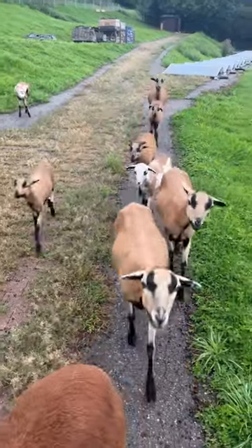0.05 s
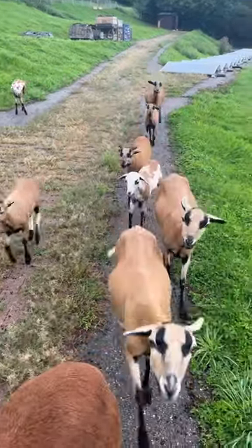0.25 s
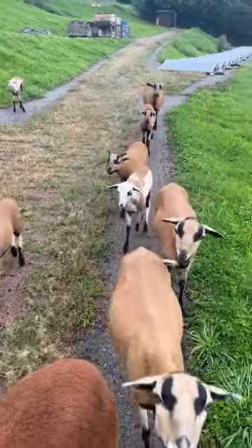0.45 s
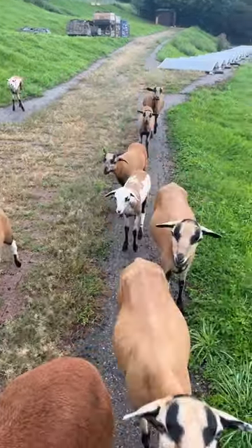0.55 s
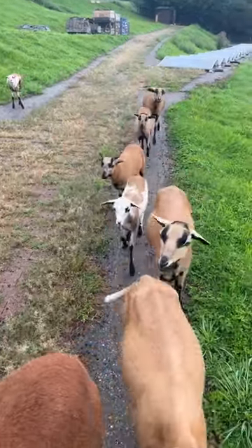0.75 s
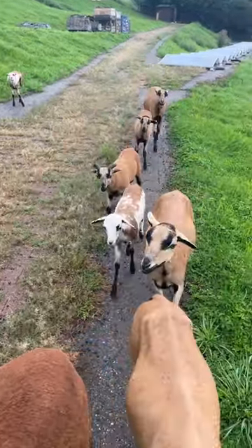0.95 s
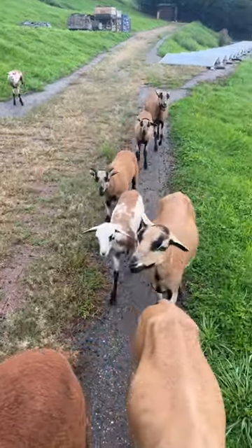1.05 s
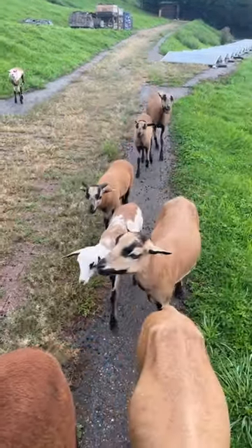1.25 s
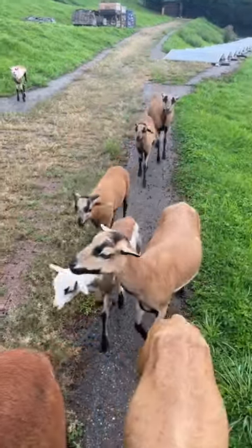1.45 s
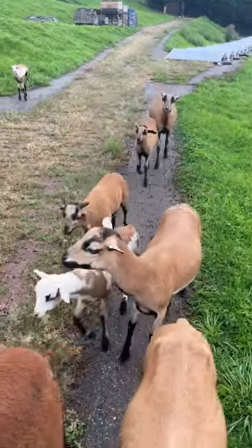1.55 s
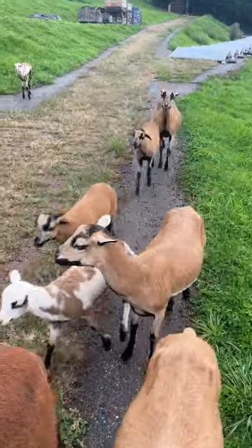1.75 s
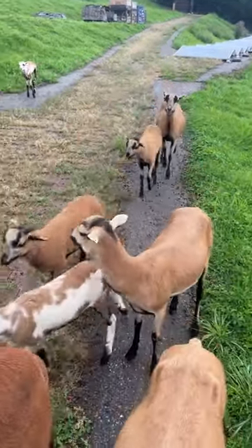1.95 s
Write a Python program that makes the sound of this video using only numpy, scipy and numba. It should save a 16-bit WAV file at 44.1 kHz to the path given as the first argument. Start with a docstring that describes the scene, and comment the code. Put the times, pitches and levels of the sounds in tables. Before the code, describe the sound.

A sheep bleats once close to the microphone: a faint creak from 0.14 s, voice catching at 0.2 s, rising to a buzzy, nasal, wavering low tone by 0.45 s, held until about 1.15 s, then sagging and cutting off near 1.35 s. Short echoes stay tight. Quiet outdoor rumble, rustle and hiss continue, with a slight swish around 1.5 s and faint gravel hoof ticks at 1.62 and 1.82 s.

```python
"""A sheep bleats once, low and buzzy, just to the right on a gravel path between fields.
Uneven vocal pulses creak in, settle to a clean wavering pitch and ring throat and chest filters;
a sine hums underneath, and delayed copies echo off the ground and the flock.
Hooves tick on gravel as filtered noise bursts, over a low outdoor rumble, rustle and hiss of shaped noise.
Two microphone ports colour left and right differently."""
import sys
import numpy as np
from scipy import signal
from scipy.fft import rfft, irfft
from scipy.io import wavfile
from scipy.ndimage import uniform_filter1d, map_coordinates
from numba import njit

SR = 44100
rng = np.random.default_rng(int(sys.argv[2]) if len(sys.argv) > 2 else 0)


def transcribe(u):
    """Save the signal u as a 16-bit wav file named by the first command-line argument.

    u: samples, shape (n,) or (channels, n), limited to [-1, 1]; the rate is SR.
    q: integer samples, one column per channel.
    """
    v = np.clip(np.atleast_2d(u).T, -1, 1)
    q = np.round(v * 32767).astype(np.int16)
    wavfile.write(sys.argv[1], SR, q)


N = 88200  # two seconds of samples
T = np.arange(N) / SR


def undb(db):
    """Turn dB into a gain."""
    return 10 ** (np.asarray(db) / 20)


def unit(x):
    """Scale to an rms of 1."""
    return x / np.sqrt(np.mean(x ** 2))


def curve(table, column=1, at=T):
    """Draw straight lines between the rows of a table whose first column is seconds."""
    columns = np.array(table).T
    return np.interp(at, columns[0], columns[column])


@njit
def band(x, hz, width):
    """Resonate with a state-variable band-pass whose centre may move, gain 1 at the centre."""
    y, band_state, low_state = np.empty(len(x)), 0., 0.
    for i in range(len(x)):
        g, damping = np.tan(np.pi * hz[i] / SR), width[i] / hz[i]
        v = (band_state + g * (x[i] - low_state)) / (1 + g * (g + damping))
        band_state = 2 * v - band_state
        low_state += 2 * g * v
        y[i] = damping * v
    return y


def resonate(x, hz, width):
    """Band-pass a sound; centre and width in Hz are numbers or curves."""
    return band(x, hz + np.zeros(N), width + np.zeros(N))


def butter(x, order, hz, kind="low"):
    """Apply a smooth low-pass or high-pass."""
    return signal.sosfilt(signal.butter(order, hz, kind, fs=SR, output="sos"), x)


def delayed(x, lag_ms):
    """Read a sound late by a lag that may change; a changing lag also bends its pitch."""
    return map_coordinates(x, [(T - lag_ms / 1000) * SR])


def noise(points):
    """Shape white noise by (Hz, relative dB) points, far weaker outside them, to an rms of 1."""
    hz, db = np.array(points).T
    f = np.maximum(np.arange(N // 2 + 1) * SR / N, 1)
    shape_db = np.interp(np.log(f), np.log(hz), db, -36 + db[0], -45 + db[-1])
    return unit(irfft(rfft(rng.standard_normal(N)) * undb(shape_db), N))


def walk(rate):
    """Wander slowly: smoothed random steps, rate of them per second, with an rms of 1."""
    k = int(SR / rate)
    steps = np.repeat(rng.standard_normal(N // k + 1), k)
    return unit(uniform_filter1d(steps, k)[:N])


# How the two microphone ports differ.
# Each row: frequency in Hz, left minus right in dB, how far the left leads in radians.
PORT_DIFFERENCE = [(100, 0, 0), (400, -2.5, -.9), (950, -8, -1.4), (1200, -10, .1), (1600, -5, .8),
                   (2250, 2.5, 1.7), (2650, 0, 1.6), (3050, -7, 2.1), (3700, -1.5, 1.6), (4400, -3, 2.1),
                   (5300, 1.5, 2.4), (6000, 0, 3.14), (7200, 0, 5.6), (8000, 0, 6.2), (8900, 0, 6.45),
                   (9600, -.5, 9.2), (10500, 0, 9.55), (12000, 0, 12.5), (13200, 0, 12.9), (14000, 0, 15.6),
                   (14900, 0, 18.2), (16000, 0, 18.8)]


def ports(x, lean_db=0):
    """Send one sound to both ports: the left is filtered and phase-shifted against the right."""
    hz, db, turn = np.array(PORT_DIFFERENCE).T
    f = np.arange(N // 2 + 1) * SR / N
    left = irfft(rfft(x) * undb(np.interp(f, hz, db)) * np.exp(1j * np.interp(f, hz, turn)), N)
    low = butter(left, 2, 1000)
    return np.array([left + low * (undb(lean_db) - 1), x])  # the lean acts on the left's lows


# Tone of the low outdoor rumble. Each row: frequency in Hz, relative strength in dB per Hz.
RUMBLE_TONE = [(25, -32), (35, -24), (48, -4.5), (85, -6.5), (113, 1.5), (140, -11.5), (200, -13.5),
               (330, -13.5), (420, -19)]
# Tone of the rustle in the middle. Each row: frequency in Hz, relative strength in dB per Hz.
RUSTLE_TONE = [(300, -24.5), (450, 1), (700, -6.5), (1400, -12), (2200, -19), (3500, -17.5), (5300, -25)]
# How loud the rustle is. Each row: time in seconds, level in dB before flicker.
RUSTLE_LOUDNESS = [(0, -68), (.06, -60), (.12, -59), (.18, -57), (1.36, -60), (1.5, -59.5), (1.62, -61),
                   (1.72, -60.5), (1.83, -60), (1.9, -61.5), (2, -61)]
# Tone of the wide rustle. Each row: frequency in Hz, relative strength in dB.
WIDE_TONE = [(35, -33), (60, 3.5), (486, 6), (732, -1), (834, 3), (1490, -5), (1700, -7.5), (5200, -14.5),
             (6760, -75), (11400, -120)]
# Tone of the thin hiss. Each row: frequency in Hz, relative strength in dB per Hz.
HISS_TONE = [(4500, 7), (6000, -1.5), (8000, -2.5), (10500, 2.5), (13000, -1.5), (14000, -4), (15500, -15),
             (16500, -15)]
# How loud the hiss is. Each row: time in seconds, level in dB before flicker and ports.
HISS_LOUDNESS = [(0, -71.5), (.17, -71), (.3, -71), (1.33, -71), (1.37, -72), (1.45, -64.5), (1.529, -59.5),
                 (1.62, -64), (1.75, -69.5), (1.82, -64.5), (1.9, -70.5), (2, -67)]
RUMBLE_DB, WIDE_DB = -49, -60.5
FLICKER_DB, FLICKER_HZ = 1.2, 14


def flicker():
    """Waver the loudness at random by a dB or so."""
    return undb(FLICKER_DB * walk(FLICKER_HZ))


def field():
    """Layer steady rumble with flickering rustle and hiss; opposite signs left and right spread the sides."""
    rumble = noise(RUMBLE_TONE) * undb(RUMBLE_DB)
    rustle = noise(RUSTLE_TONE) * undb(curve(RUSTLE_LOUDNESS)) * flicker()
    side = noise(WIDE_TONE) * undb(WIDE_DB) * flicker()
    hiss = noise(HISS_TONE) * undb(curve(HISS_LOUDNESS)) * flicker()
    middle = rumble + rustle
    return np.array([middle + side, middle - side]) + ports(hiss)


HOOF_FALL_S, HOOF_RISE_S = .004, .0006
KNOCK = 10.3  # size of the first knock against the crunch
# Hooves on gravel. Each row: time in seconds, gain in dB before filtering, centre of the tone in Hz.
HOOF_STEPS = [(0.108, -60, 9600), (0.167, -45.5, 7600), (1.62, -37, 900), (1.66, -54, 5060),
              (1.819, -46.5, 3650), (1.835, -47, 1900)]


def hooves():
    """Crunch gravel: a knock inside a very short noise burst, band-passed twice."""
    out = np.zeros(N)
    for s, db, hz in HOOF_STEPS:
        fade_s = np.where(T < s, HOOF_RISE_S, HOOF_FALL_S)
        burst = np.exp(-np.abs(T - s) / fade_s) * rng.standard_normal(N)
        burst[int(s * SR)] += KNOCK
        out += undb(db) * resonate(resonate(burst, hz, hz), hz, hz)
    return ports(out)


# How the bleat changes. Each row: time in seconds, relative level in dB, then trims in dB for the second,
# the third and the fourth throat row, the fifth to seventh together and the eighth, left minus right lean
# of the lows in dB, then trims in dB for the treble (last three throat rows), nasal ring and chest.
BLEAT_SHAPE = [(0.19, -54.5, 12.5, 13, -28, -17, -5, -5, -11, -8, 3),
               (0.206, -43, 2.5, 18, -2, -4.5, 2.5, 4, -6, -10, 8),
               (0.25, -39, -3, -1, -6.5, -10, -5, 0.5, 1, -6, 0.5),
               (0.296, -38.5, -3, -2.5, -8.5, -6, -15, 6, -2, 5, -13),
               (0.312, -38, 2.5, 4, 0, -8, -5, -2, 5, -11, 4),
               (0.356, -35, 2.5, 11, 4, 4.5, 3.5, 2.5, 6.5, 14, 6.5),
               (0.42, -31.5, 3, 11.5, 3.5, 0, 5, 3, 7, 2, -8),
               (0.455, -28.5, -1, 7, -3, -4, 3, 0, 1.5, 6, -3.5),
               (0.532, -28.5, -1, 6, -3.5, -2.5, 2.5, -1, 4, -12, -5.5),
               (0.592, -29.5, 3.5, 7.5, -0.5, 1.5, 1, 1, 5.5, -8, 1.5),
               (0.64, -31.5, 2.5, 4.5, -0.5, 1, 5.5, -0.5, 17.5, -11, -2),
               (0.676, -32.5, -0.5, 0, 0, 0.5, 5.5, -1, 11, -6, -3),
               (0.748, -32.5, -1, -1.5, 0, 0, -4, -0.5, 1, -9, 0),
               (0.832, -30, 2, 2, 3.5, -0.5, 2.5, 1.5, 5, 1, 3.5),
               (0.928, -30.5, -3, -1, 2, -1, -5, 1, -1, -5, -2),
               (1.01, -30.5, -9.5, 0.5, -1.5, -5, 2, 1.5, -3.5, 16, -2.5),
               (1.074, -28.5, -4.5, 1.5, -0.5, -1, 2, 2, 4, 7.5, -1.5),
               (1.116, -29.5, -4.5, 1.5, -2, -3.5, 1, 3, -9, 7, 0),
               (1.178, -35, -1.5, 2.5, 3, 0.5, 3.5, 3.5, -4, 10.5, 1),
               (1.285, -36, -8.5, -3, 0.5, -4.5, -5.5, 1.5, -21, 9, 2.5),
               (1.318, -37.5, -15.5, -9, -9, -14.5, -23, 5, -22, 7, -6.5),
               (1.35, -68.5, 6, -17, -16, -27, 1, 1, -5, -10, -2)]
START_S, END_S = BLEAT_SHAPE[0][0], BLEAT_SHAPE[-1][0]


def bleat(column):
    """Follow one column of the bleat over time."""
    return curve(BLEAT_SHAPE, column)


CREAK_S, CREAK_HZ, CREAK_DB = 0.14, 95.6, -60.5  # faint creak before the voice catches
CREAK_DB_PER_S = 130
FIRST_PULSE_S = .1945
CLOSE_S = 1.324  # vocal pulses stop here
HUM_SAG_HZ_PER_S = 480
# Pitch of the bleat. Each row: time in seconds, pitch in Hz before the sag at the close.
VOICE_PITCH = [(0.19, 109.2), (0.215, 112.5), (0.24, 123.8), (0.265, 136.4), (0.29, 143.1), (0.31, 159),
               (0.33, 166.4), (0.345, 172.6), (0.365, 177.1), (0.4, 175.8), (0.425, 176.2), (0.445, 180.2),
               (0.465, 181.5), (0.49, 180.9), (0.515, 176.6), (0.535, 179.4), (0.555, 175.5),
               (0.572, 180.9), (0.59, 182.7), (0.615, 177), (0.645, 172.8), (0.675, 167.1), (0.73, 168),
               (0.755, 166.3), (0.79, 172.8), (0.815, 175.7), (0.84, 175.8), (0.87, 172.3), (0.91, 164.9),
               (0.93, 162.3), (0.97, 164.7), (1.012, 162.1), (1.045, 169.3), (1.07, 172.1), (1.095, 172.3),
               (1.115, 171.5), (1.15, 163.6), (1.18, 156.7), (1.22, 154.9), (1.27, 154), (1.293, 149.5),
               (1.313, 138.8), (1.335, 129.9)]


def vocal_cycles():
    """Count vocal cycles: the creak's rate, then the pitch curve, which sags after the pulses stop."""
    sag = HUM_SAG_HZ_PER_S * np.clip(T - CLOSE_S, 0, .1)
    phase = np.cumsum(np.where(T < START_S, CREAK_HZ, curve(VOICE_PITCH) - sag)) / SR
    return phase - np.interp(FIRST_PULSE_S, T, phase) % 1


def voice_gain():
    """Let the level rise through the creak, follow the bleat and die away at its end."""
    release_s = 0.068  # time to fall 60 dB
    creak_db = CREAK_DB - CREAK_DB_PER_S * np.clip(START_S - T, 0, 1)
    db = np.where(T < START_S, creak_db, bleat(1)) - 60 * np.clip(T - END_S, 0, 1) / release_s
    gain = uniform_filter1d(undb(db) * (T > CREAK_S), size=100)
    return gain * np.sqrt(SR / curve(VOICE_PITCH))  # fewer pulses per second need more strength each


# Roughness of the voice. Each row: time in seconds, timing scatter as a share of the period,
# size scatter in dB, strong-weak step up and down in dB, relative breath level in dB.
ROUGHNESS = [(.12, .1, 3, 0, -16), (.18, .08, 3, 0, -18), (.19, .008, 1, 0, -26), (.26, .012, 1.5, 0, -24),
             (.32, .008, 1, .5, -24), (.36, .001, .3, 0, -30), (.6, .002, .5, 0, -28),
             (1.25, .001, .3, 0, -30), (1.29, .006, 1, 2, -23), (1.315, .015, 1.5, 1, -14),
             (1.325, .01, 1, 0, -2), (1.35, .05, 3, 0, 0)]
# Single harder pulses as the voice catches. Each row: time in seconds, added strength in dB.
VOICE_CATCHES = [(.2755, 7), (.303, 8), (.3155, 4), (1.29, 2)]
RASP_HZ, RASP_DB = 2970, 3.5  # the breath is stronger in the upper voice


def vocal_folds(phase):
    """Make one sharp pulse per cycle and a fading puff of breath noise; return low and high drive."""
    cycles = np.arange(1, int(phase[-1]))
    at = np.interp(cycles, phase, T)
    time_chance, size_chance = rng.standard_normal((2, len(at)))
    at = at + curve(ROUGHNESS, 1, at) * time_chance / curve(VOICE_PITCH, 1, at)
    size_db = curve(ROUGHNESS, 2, at) * size_chance + curve(ROUGHNESS, 3, at) * (-1.) ** cycles
    size = undb(size_db) * (at < CLOSE_S)
    for s, db in VOICE_CATCHES:
        size[np.argmin(np.abs(at - s))] *= undb(db)

    # a windowed sinc places each pulse between samples
    place = at[:, None] * SR
    index = np.clip(np.round(place).astype(int) + np.arange(-8, 9), 0, N - 1)
    shape = np.sinc(index - place) * np.cos(np.pi * (index - place) / 18) ** 2
    pulses, even = np.zeros(N), np.zeros(N)
    np.add.at(pulses, index, -shape * size[:, None])
    np.add.at(even, index, -shape * np.sqrt(size[:, None]))  # sizes differ less

    puff = undb(curve(ROUGHNESS, 4)) * 0.48 * np.exp(-(phase % 1) / 1.33) * rng.standard_normal(N)
    rasp = undb(RASP_DB) * butter(puff, 2, RASP_HZ, "high")
    gain = voice_gain()
    return gain * (even + puff / 4), gain * (pulses + puff / 2 + rasp)


# Throat resonances. Each row: centre in Hz, width in Hz, relative level in dB before the bleat's trims.
# The moving mouth replaces the centres of rows one, three, four and five and the widths of one and three.
THROAT_RINGS = [(780, 107, 7), (1474, 546, -9), (2711, 161, -2.5), (3327, 555, -7), (5000, 299, -4.5),
                (4110, 300, -25.5), (5550, 570, -9), (6700, 3460, -27.5), (9460, 510, -26.5),
                (10400, 2040, -31.5), (14000, 1200, -46)]
# The moving mouth. Each row: time in seconds, centres in Hz of the first, third, fourth and fifth
# throat resonance, width in Hz of the first, width in Hz of the third.
MOUTH = [(.2, 706, 2680, 3350, 4600, 110, 71.5), (0.298, 737, 2657, 3350, 5100, 107, 159),
         (.38, 763, 2668, 3300, 4830, 106, 85), (.45, 734, 2740, 3120, 4850, 74.6, 87),
         (.6, 746, 2763, 3270, 4930, 74, 91), (.68, 753, 2670, 3280, 4980, 111, 170),
         (.76, 758, 2690, 3140, 4950, 111, 199), (.85, 754, 2637, 3300, 5110, 102, 166),
         (.95, 736.6, 2714, 3247, 4693, 109.8, 202), (1.05, 748, 2780, 3490, 4850, 110, 200),
         (1.13, 795, 2880, 3650, 4870, 113, 200), (1.201, 807.3, 2781, 3470, 5000, 119, 292),
         (1.32, 818, 2638, 3444, 5080, 130, 348)]
NASAL_HZ, NASAL_WIDTH_HZ, NASAL_DB = 1542, 37, -12
TREBLE_FLICKER_DB, TREBLE_FLICKER_HZ = 4.5, 14.02
ROLL_OFF_HZ = 14400


def throat(low, high):
    """Ring the air of the throat and nose: side-by-side band-passes, some moving with the mouth."""
    treble = bleat(8) + TREBLE_FLICKER_DB * walk(TREBLE_FLICKER_HZ)
    trim = [0] + [bleat(c) for c in (2, 3, 4, 5, 5, 5, 6)] + [treble] * 3
    out = undb(NASAL_DB + bleat(9)) * resonate(low, NASAL_HZ, NASAL_WIDTH_HZ)
    for k, (centre, width, level_db) in enumerate(THROAT_RINGS):
        if k in (0, 2, 3, 4):
            centre = curve(MOUTH, max(k, 1))
        if k in (0, 2):
            width = curve(MOUTH, 5 + k // 2)
        drive = high if k else resonate(low, centre, 850)
        sign = -(-1) ** (k + (k > 4))  # neighbours alternate, except rows five and six
        out = out + sign * undb(level_db + trim[k]) * resonate(drive, centre, width)
    return butter(butter(out, 4, ROLL_OFF_HZ), 2, 450, "high")


CHEST_WIDTH_HZ, SECOND_DB, THIRD_DB = 33, -10.5, -12


def chest(low):
    """Ring the second and third harmonics with narrow band-passes that follow the pitch."""
    out = 0
    for harmonic, db in ((2, SECOND_DB), (3, THIRD_DB)):
        hz = harmonic * curve(VOICE_PITCH)
        once = resonate(low, hz, CHEST_WIDTH_HZ)
        out = out + undb(db + bleat(10)) * resonate(once, hz, CHEST_WIDTH_HZ)
    return out


# Chest hum, earlier and longer than the buzz. Each row: time in seconds, rms level in dB.
HUM_LEVEL = [(.17, -56), (.21, -45), (.28, -44), (.36, -46.5), (.6, -44.5), (.72, -48), (.84, -42),
             (.96, -47.5), (1.09, -42), (1.2, -44.5), (1.3, -46), (1.335, -39.5), (1.37, -58), (1.41, -75)]


def chest_hum(phase):
    """Hum a sine on the fundamental of the voice."""
    level_db = np.interp(T, *np.array(HUM_LEVEL).T, -99, -99)
    return np.sqrt(2) * undb(level_db) * np.sin(2 * np.pi * phase)


GROUND_DB = -9
# As the head comes nearer or lower, the ground echo lags more. Each row: time in seconds, lag in ms.
GROUND_ECHO_LAG = [(.2, 0.96), (.5, 0.9), (.7, 0.93), (.85, 0.97), (1.05, 1.01), (1.15, 1.105),
                   (1.25, 1.044), (1.32, 1.33)]


def ground_echo(voice):
    """Reflect the voice off the ground as one weaker copy with a moving lag."""
    return undb(GROUND_DB) * delayed(voice, curve(GROUND_ECHO_LAG))


# Echoes off the flock around. Each row: lag in ms at the start of the bleat, drift of the lag
# in ms per second, left gain in dB, right gain in dB.
FLOCK_ECHOES = [(1.9, 0.48, -42, -41), (2.8, -0.526, -65, -13.5), (4.1, 0.887, -21.5, -24),
                (5.3, -0.885, -41, -22.5), (7.7, 1.41, -55, -26.5), (11.2, -1.56, -38, -24.5)]


def flock_echoes(voice):
    """Reflect a broad band of the voice off the flock, with slowly drifting lags."""
    bright, out = resonate(voice, 3000, 9600), 0
    for ms, drift, left_db, right_db in FLOCK_ECHOES:
        out = out + undb([[left_db], [right_db]]) * delayed(bright, ms + drift * (T - START_S))
    return out


def sheep():
    """Drive throat and chest with vocal pulses and breath, then add the hum and the echoes."""
    phase = vocal_cycles()
    low, high = vocal_folds(phase)
    voice = undb(17.5) * (throat(low, high) + chest(low))
    voice = voice + ground_echo(voice)
    return chest_hum(phase) + ports(voice, bleat(7)) + flock_echoes(voice)


def scene():
    """Mix field, hooves and sheep."""
    return field() + hooves() + sheep()


def record(dry):
    """Cut the top above 15.7 kHz with a steep low-pass, as the phone does."""
    return signal.sosfilt(signal.ellip(10, .2, 80, 15700, fs=SR, output="sos"), dry)


dry = scene()
out = record(dry)
transcribe(out)
```